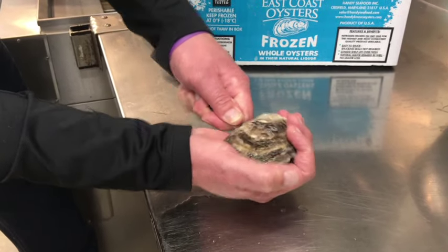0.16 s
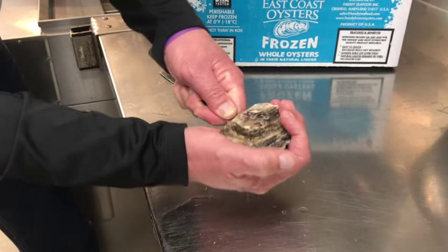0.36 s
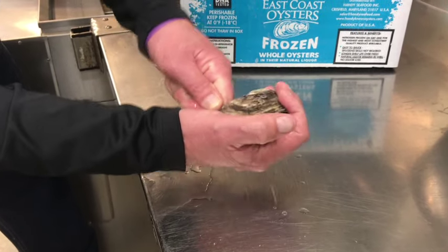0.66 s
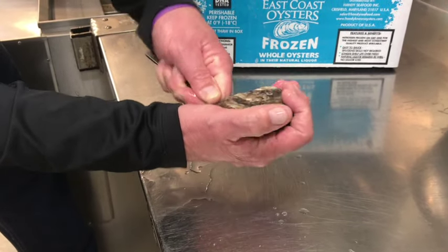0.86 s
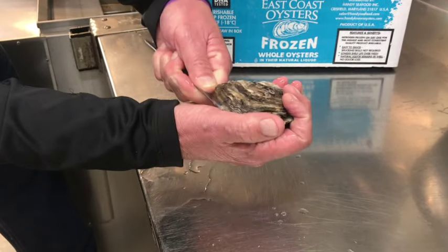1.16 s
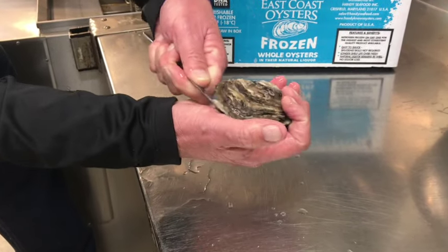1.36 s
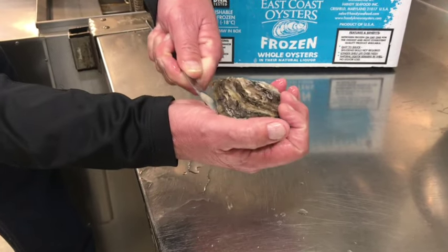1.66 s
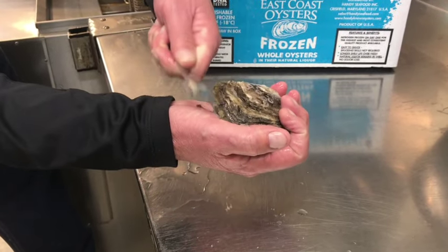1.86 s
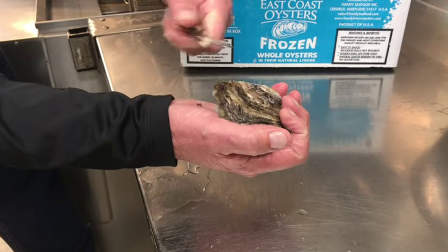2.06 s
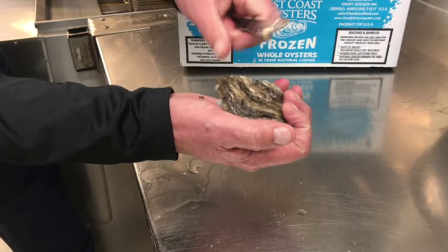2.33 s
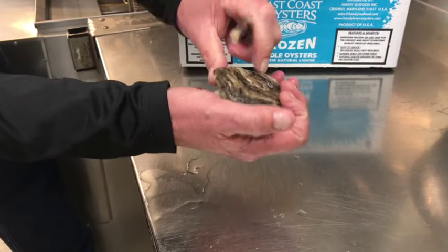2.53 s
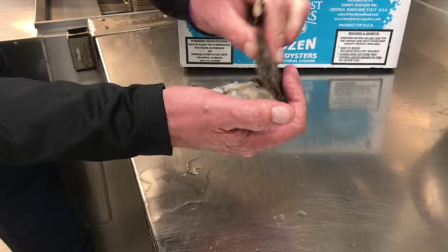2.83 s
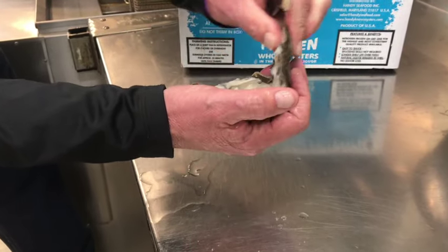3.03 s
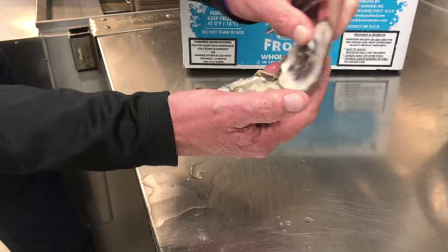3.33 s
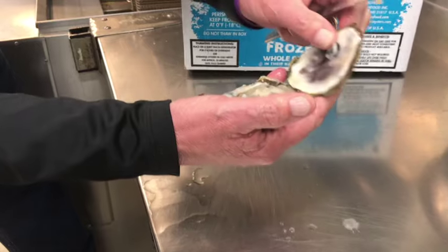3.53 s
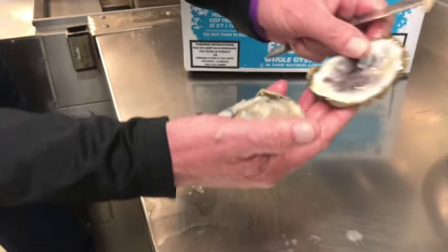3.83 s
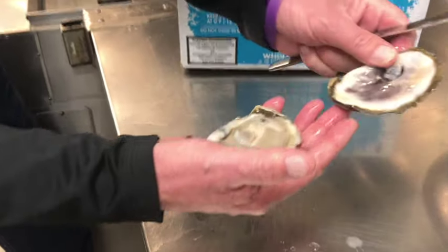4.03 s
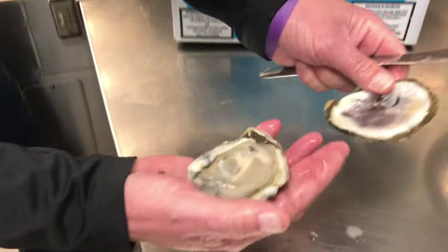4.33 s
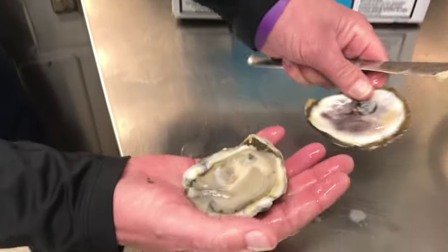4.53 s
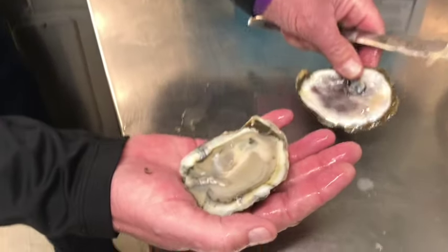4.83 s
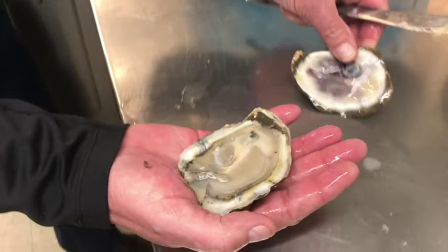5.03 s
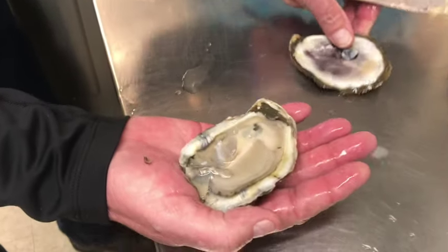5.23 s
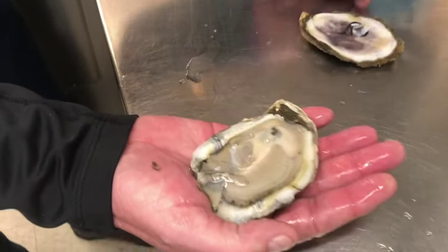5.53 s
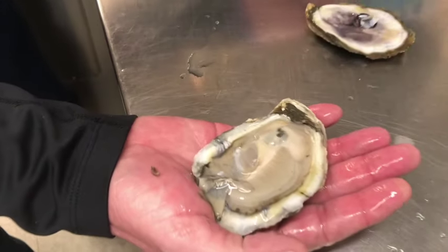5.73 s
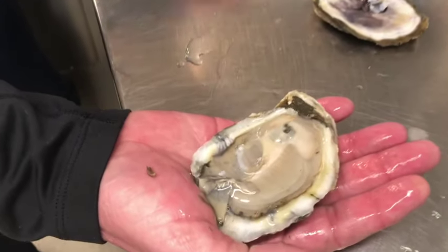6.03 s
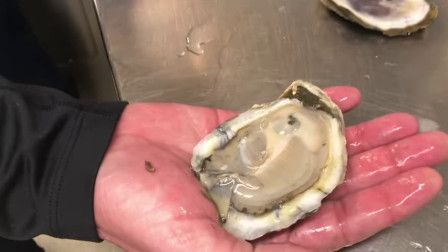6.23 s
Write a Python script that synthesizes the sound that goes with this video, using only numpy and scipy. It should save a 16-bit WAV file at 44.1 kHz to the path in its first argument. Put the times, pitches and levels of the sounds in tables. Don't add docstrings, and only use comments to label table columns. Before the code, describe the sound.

Close wet shell cracks and gritty blade scrapes in a hard-walled kitchen, followed by sparse bright shell knocks on steel above a low pulsing drone.

```python
import sys
import numpy as np
from scipy import signal
from scipy.fft import rfft, irfft
from scipy.io import wavfile
from scipy.ndimage import uniform_filter1d

SR = 44100
rng = np.random.default_rng(int(sys.argv[2]) if len(sys.argv) > 2 else 0)


def wav_out(sig):
    wavfile.write(sys.argv[1], SR, np.round(np.clip(np.atleast_2d(sig).T, -1, 1) * 32767).astype(np.int16))


def magnitude_from_level(level_db):
    exponent = np.asarray(level_db, float) / 20
    return 10 ** exponent


N = 281358

# pitch_hz [Hz], peak_db [dB], t60_s (time to fade by 60 dB) [s]
SHELL = [(2980, -6, .008), (3440, -7, .008), (3800, -6, .009), (4050, -7, .008), (4500, -7, .008),
         (3700, -6, .0012), (2350, -9, .004)]
# pitch_hz [Hz], peak_db [dB], t60_s [s]
HOLLOW = [(1270, -28.5, 0.0095), (1720, -21.5, 0.01), (1877, -7.5, 0.0048), (2080, -13, .01),
          (2340, -25.5, 0.018)]

HOLLOW_SHUT_HZ, HOLLOW_RISE_HZ_PER_S = 1620, 97
SHAFT_HZ, WHINE_HZ, BUZZ_HZ = 58.63, 986.4, 119.88
SLOT_HZ, SLOT_TWIN_HZ, FAN_HZ, PUMP_HZ, IDLER_HZ = 602.53, 604.7, 527.76, 752., 34.96


def walk(rate_hz):
    k = int(SR / rate_hz)
    steps = np.repeat(rng.standard_normal(N // 1000), k)[:N]
    smooth = uniform_filter1d(uniform_filter1d(steps, k), k)
    return smooth / smooth.std()


def cooler():
    # time_s [s], level_db [dB]
    shaft = [(0.0, -35.5), (0.14, -35), (0.85, -36.5), (2.1, -36), (3.62, -38.5), (5.12, -35.5),
             (6.11, -35.5), (6.38, -36.5)]
    # first_hz [Hz], second_hz [Hz], first_db [dB rms],
    # second_db [dB rms], in_step_s (when they line up) [s]
    pairs = [(2 * SHAFT_HZ, BUZZ_HZ, -59, -53, .05), (4 * SHAFT_HZ, 2 * BUZZ_HZ, -58, -58, .113),
             (SLOT_HZ, SLOT_TWIN_HZ, -71, -76, .378),
             (SLOT_HZ + BUZZ_HZ, SLOT_TWIN_HZ + BUZZ_HZ, -68, -63, .074),
             (2 * FAN_HZ, 1058.66, -74, -71, .307), (2 * SLOT_HZ, 2 * SLOT_TWIN_HZ, -74, -80, 0)]
    # pitch_hz [Hz], level_db [dB rms]
    lone = [(IDLER_HZ, -75), (2 * IDLER_HZ, -70), (3 * BUZZ_HZ, -71), (FAN_HZ, -76), (3 * FAN_HZ, -72),
            (PUMP_HZ, -69), (3 * PUMP_HZ, -78), (SLOT_HZ + 2 * BUZZ_HZ, -75), (82.47, -61), (257.26, -61),
            (267.25, -65), (322.2, -68), (779.4, -77), (816.5, -77), (2533., -73)]
    # time_s [s], pitch_hz [Hz], level_db [dB]
    squeak = [
        (6.12, 883, -88),
        (6.2, 940, -62),
        (6.27, 988, -60),
        (6.31, 912, -55),
        (6.34, 920, -99),
    ]
    whine_dbs = [-85, -83, -76, -83, -86, -84, -85, -87, -91, -94, -92, -94, -90, -93]
    t = np.arange(N) / SR
    shaft_db = np.interp(t, *np.transpose(shaft)) + 0.44 * walk(5.76)
    out = magnitude_from_level(shaft_db) * np.sin(2 * np.pi * SHAFT_HZ * t)

    tones = [(hz, db, 0) for hz, db in lone]
    for first_hz, second_hz, first_db, second_db, in_step_s in pairs:
        tones += [(first_hz, first_db, in_step_s), (second_hz, second_db, in_step_s)]
    for hz, db, in_step_s in tones:
        out += magnitude_from_level(db + 1.2 * walk(3)) * np.sin(2 * np.pi * hz * (t - in_step_s))
    for k, db in enumerate(whine_dbs, start=1):
        out += magnitude_from_level(db + 2.2 * walk(5)) * np.sin(2 * np.pi * WHINE_HZ * k * t)

    s, hz, db = np.transpose(squeak)
    squeak_turns = np.cumsum(np.interp(t, s, hz)) / SR
    out += magnitude_from_level(np.interp(t, s, db, -200, -200)) * np.sin(2 * np.pi * squeak_turns)
    return np.sqrt(2) * out


def air():
    # pitch_hz [Hz], level_db [dB per Hz]
    color = [(28, -18.5), (80, -8.5), (100, -2.5), (140, -2.5), (165, -10.5), (200, 1), (225, -7.5),
             (260, -2), (370, -9.5), (420, -16), (1300, -21), (2000, -26), (3100, -31.5), (9500, -39),
             (15500, -40)]
    f = np.fft.rfftfreq(N, 1 / SR) + 1
    hz, db = np.transpose(color)
    housing_dip_db = 5.5 * np.exp(-((f - 10500) / 450) ** 2)
    shape_db = np.interp(np.log(f), np.log(hz), db) - housing_dip_db
    bass_cut = np.minimum(f / hz[0], 1) ** 2
    noise = irfft(rfft(rng.standard_normal(N)) * magnitude_from_level(shape_db) * bass_cut, N)
    return noise / noise.std() * magnitude_from_level(-50 + 0.16 * walk(1.4))


def ring(modes, size):
    damped_s = .018
    t = np.arange(size) / SR
    hz, db, t60 = np.transpose(modes)[:, :, None]
    t60 = np.minimum(t60, damped_s * np.minimum(3000 / hz, 1) ** .5)
    sense = (-1.) ** np.arange(len(hz))[:, None]
    decay = np.exp(-np.log(1000) * t / t60)
    return (sense * magnitude_from_level(db) / t60 * np.sin(2 * np.pi * hz * t) * decay).sum(axis=0)


def grit(size, spread_db):
    size_db = spread_db * np.minimum(rng.exponential(size=size), 4.5)
    return rng.standard_normal(size) * magnitude_from_level(size_db)


def shuffled(modes):
    chance = rng.standard_normal((len(modes), 2))
    detune = 1 + .012 * chance[:, :1] * [1, 0, 0]
    return np.array(modes) * detune + 2 * chance[:, 1:] * [0, 1, 0]


def parted(s):
    open_s = 3.4
    rise = HOLLOW_RISE_HZ_PER_S * min(s, open_s) / HOLLOW_SHUT_HZ / 2
    return np.array(HOLLOW) * [1 + rise, 1, 1]


def add(out, s, x):
    i = int(s * SR)
    out[i:i + len(x)] += x[:N - i]


def chip(out, s, crumble_s, *bodies):
    t = np.arange(1024) / SR
    burst = grit(size=1024, spread_db=3.0) * np.exp(-t / crumble_s) * (1 - np.exp(-t / 0.0013))
    for modes, db in bodies:
        sound = signal.fftconvolve(burst, ring(modes, size=1024))
        add(out, s, sound * magnitude_from_level(db) / np.abs(sound).max())


def scrape(out, strokes, steel, stutter_db):
    for most_s, length_s, *dbs in strokes:
        start_s = most_s - 0.39 * length_s
        end_s = start_s + length_s
        t = np.arange(start_s, end_s, 1 / SR)
        catch = magnitude_from_level(stutter_db * np.repeat(rng.standard_normal(64), 128))
        swell = np.interp(t, [start_s, most_s, end_s], [0, 1, 0]) ** 1.3
        slips = (grit(size=8192, spread_db=2.6) * catch)[:len(t)] * swell
        for modes, db in zip((parted(most_s)[1:5], SHELL, steel), dbs):
            firmly_held = shuffled(modes) * [1, 1, .55]
            body = signal.fftconvolve(slips, ring(firmly_held, size=1024))
            add(out, start_s, body / body.std() * magnitude_from_level(db - 1.5))


def prying():
    # start_s [s], hollow_db [dB], shell_db [dB], blade_db [dB],
    # pitch_hz (of the body that leads) [Hz]
    twist = [(0.0955, -35.5, -53, -65, 1730), (0.1212, -34, -52.5, -62, 1620),
             (0.184, -31.5, -53, -50.5, 1430), (0.2914, -26, -50.5, -44, 1385),
             (0.405, -27, -51, -54, 1720), (0.4207, -7, -38, -33.5, 1680), (0.4234, -0.5, -47, -58, 1770),
             (0.605, -22, -45, -43.5, 1650), (0.7128, -48, -63, -76, 2010),
             (0.7469, -32.5, -44.5, -45, 1900), (0.8425, -19, -59, -40.5, 1644),
             (0.8605, -29, -39.5, -34, 4040), (1.1677, -41, -45.5, -50.5, 3880),
             (1.3211, -17.5, -33.5, -30, 1740)]
    # start_s [s], hollow_db [dB], shell_db [dB], blade_db [dB], pitch_hz [Hz]
    cut = [(1.6853, -11.5, -23.5, -20, 1880), (1.9597, -25, -36, -45, 1820),
           (2.1156, -46, -51, -46.5, 3400), (2.19, -35, -36, -33, 6100), (2.2104, -23, -40, -52, 1970),
           (2.3005, -22.5, -23, -36, 2440), (2.451, -24, -53, -58, 2270), (2.5508, -43, -31, -32.5, 5860),
           (2.611, -33, -27.5, -55, 4030), (2.7504, -19, -42.5, -41, 1920), (2.7651, -25, -56, -60, 2010),
           (2.7994, -40, -64, -70, 2020), (2.8552, -39, -70, -72, 2030)]
    # loudest_s [s], length_s [s], hollow_db [dB], shell_db [dB], blade_db [dB]
    strokes = [(.415, 0.054, -68, -59, -47.5), (.71, 0.16, -56, -58, -56.5), (.87, 0.15, -64, -62, -57),
               (1.14, .1, -56.5, -66, -63), (1.32, 0.041, -45.5, -44, -44.5),
               (1.958, 0.074, -52.5, -52, -50.5), (2.185, .07, -45, -50, -44.5),
               (2.202, 0.063, -43, -56, -39), (2.313, 0.079, -54, -41, -43), (2.48, .1, -52, -61, -54.5),
               (2.545, 0.08, -47.5, -49, -42.5), (2.624, 0.041, -44.5, -38, -40),
               (2.655, 0.068, -50, -62, -55), (2.722, .1, -43.5, -51.5, -46.5)]
    # pitch_hz [Hz], peak_db [dB], t60_s [s]; the last two are the broad crack
    blade_modes = [(5400, -5, 0.006), (5720, 3.5, 0.0072), (5930, 3, 0.0087), (6380, 0.5, 0.0086),
                   (6820, -6, 0.005), (7800, -8, 0.0051), (8080, -7, 0.0053), (9110, -6, 0.011),
                   (9570, -6.5, 0.0096), (12500, -16, 0.0041), (12060, -14, 0.0028), (14240, -16, 0.0017),
                   (5980, 0, 0.0011), (12500, -18, 0.00018)]
    out = np.zeros(N)
    for s, hollow_db, shell_db, blade_db, hz in twist + cut:
        hollow_leads = hz < 2700
        hollow_hz = hz if hollow_leads else HOLLOW_SHUT_HZ + HOLLOW_RISE_HZ_PER_S * s
        shell_hz = 3950 if hollow_leads else hz
        hollow = np.vstack([(hollow_hz, 0, .017), shuffled(parted(s))])
        shell = np.vstack([(shell_hz, -1, .01), shuffled(SHELL)])
        blade = shuffled(blade_modes)
        in_hinge = s < cut[0][0]
        blade[:, 1] += -4.5 * in_hinge * (blade[:, 0] < 6600)
        chip(out, s, 0.0033, (hollow, hollow_db - 6), (shell, shell_db + 6.5), (blade, blade_db + 10.0))
    scrape(out, strokes, blade_modes, stutter_db=3)
    return out


def laying():
    # start_s [s], shell_db [dB], lid_db [dB], lid_hz [Hz]
    touches = [(3.8404, -68, -64, 6170), (4.1403, -72, -61, 6530), (4.507, -59, -63, 5860),
               (4.595, -58, -62, 5910), (4.6833, -39, -34, 5930), (4.936, -62, -52, 5250),
               (5.0454, -53, -52, 7100), (5.1094, -48, -47, 5460), (5.447, -38, -30, 6885),
               (5.6323, -54, -47, 6100), (5.919, -51, -58, 6070)]
    # loudest_s [s], length_s [s], hollow_db [dB], shell_db [dB], lid_db [dB]
    strokes = [
        (4.1, .11, -79, -83, -77),
        (4.93, .08, -57, -73, -57.5),
        (5.195, 0.074, -73, -68, -54.5),
        (5.482, 0.051, -82, -71, -65),
        (5.703, .075, -59.5, -60, -55),
        (5.97, 0.12, -58, -53, -53.5),
        (6.16, .05, -73, -70, -69),
    ]
    # pitch_hz [Hz], peak_db [dB], t60_s [s]; the last two are the broad crack
    lid_modes = [(5700, 0.5, 0.0092), (5980, 5, 0.016), (6530, -1.5, 0.0079), (7520, -1, 0.0081),
                 (8100, -1, 0.011), (9130, 0, 0.01), (9980, -1, 0.0055), (11900, -20, 0.0081),
                 (12200, -1, 0.0042), (14400, -16, 0.0036), (6770, -1.5, 0.00093), (12300, -8.5, 0.00061)]
    out = np.zeros(N)
    for s, shell_db, lid_db, lid_hz in touches:
        shell_hz = 2850 + 32.5 * (shell_db + 58.5)
        hollow = np.vstack([(2400, -8, .015), shuffled(HOLLOW)])
        shell = np.vstack([(shell_hz, 0, .012), (2800, -4, .01), shuffled(SHELL)])
        lid = np.vstack([(lid_hz, 4, .012), shuffled(lid_modes)])
        chip(out, s, 0.0063, (hollow, shell_db - 12.0), (shell, shell_db + 3.0), (lid, lid_db + 8.0))
    scrape(out, strokes, lid_modes, stutter_db=2.8)
    return out


def kitchen(x, wet_db, gap_s):
    # pitch_hz [Hz], t60_s [s]
    echo = [(1000, 0.27), (2000, 0.31), (4000, 0.31), (8000, 0.24), (15000, 0.17)]
    t = np.arange(SR // 2) / SR
    hz, t60 = np.transpose(echo)
    tail = 0
    for centre in 700 * 2 ** np.arange(0, 4.6, .5):
        edges = [centre / 2 ** .25, min(centre * 2 ** .25, .45 * SR)]
        band = signal.butter(2, edges, "bandpass", fs=SR, output="sos")
        decay_s = np.interp(np.log(centre), np.log(hz), t60)
        noise = signal.sosfilt(band, rng.standard_normal(len(t)))
        tail = tail + noise * np.exp(-np.log(1000) * t / decay_s)
    tail = tail * (1 - np.exp(-(t / gap_s) ** 2))
    return signal.fftconvolve(x, tail * magnitude_from_level(wet_db) / np.sqrt(np.sum(tail ** 2)))[:N]


def scene():
    near = prying() + laying()
    near = signal.sosfilt(signal.butter(3, 1000, "highpass", fs=SR, output="sos"), near)
    return (near + kitchen(near, wet_db=-4, gap_s=0.0012) + cooler() + air())[None]


def roll_off(x):
    return signal.sosfilt(signal.butter(12, 16650, fs=SR, output="sos"), x)


def record(dry):
    top_cut = signal.ellip(8, .2, 40, 15750, fs=SR, output="sos")
    mix = signal.sosfilt(top_cut, dry)
    return roll_off(mix)


dry = scene()
out = record(dry)
wav_out(out)
```